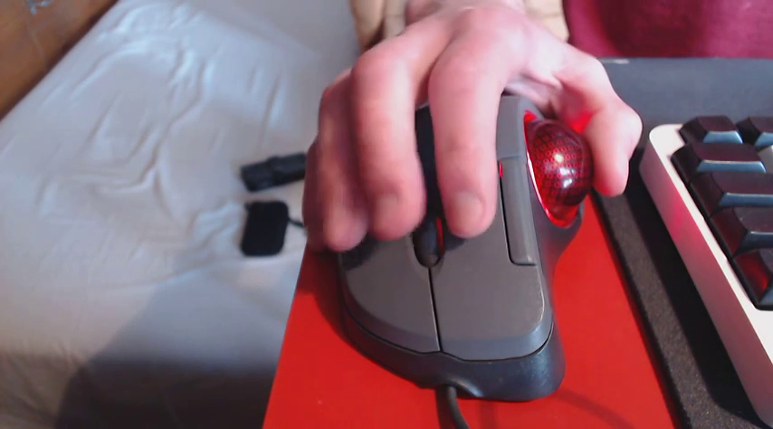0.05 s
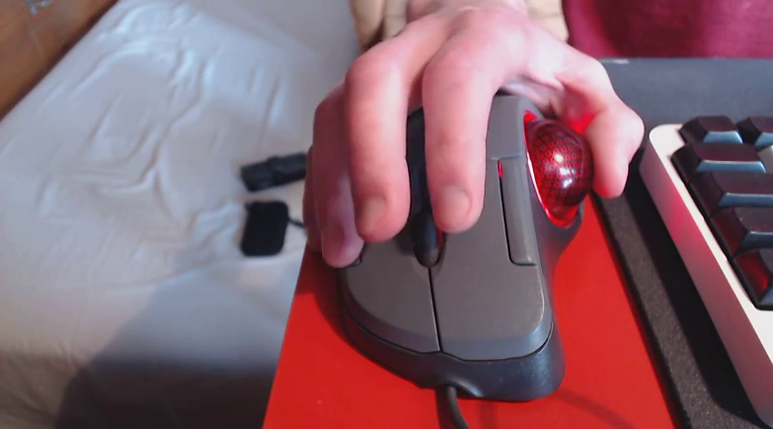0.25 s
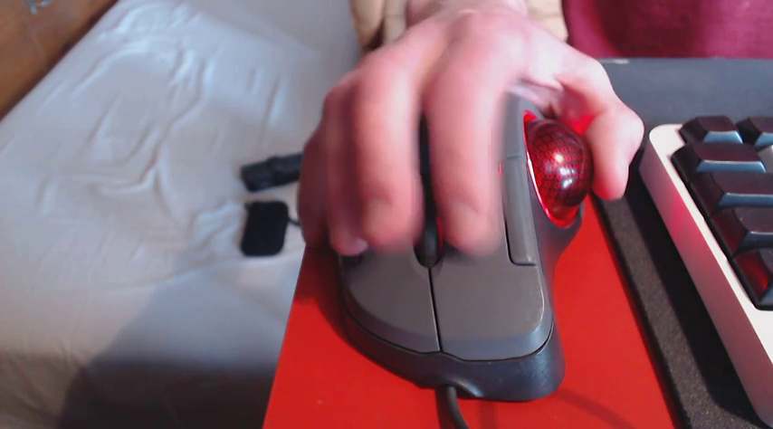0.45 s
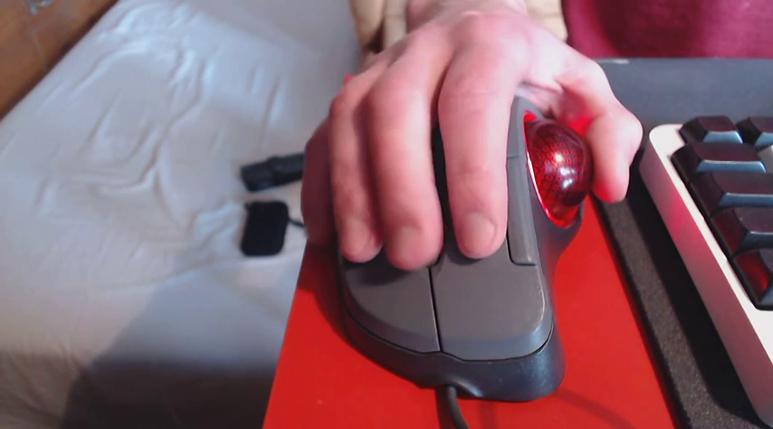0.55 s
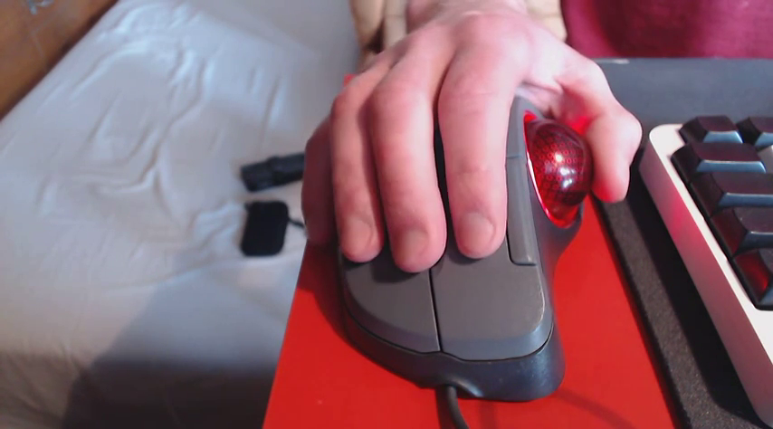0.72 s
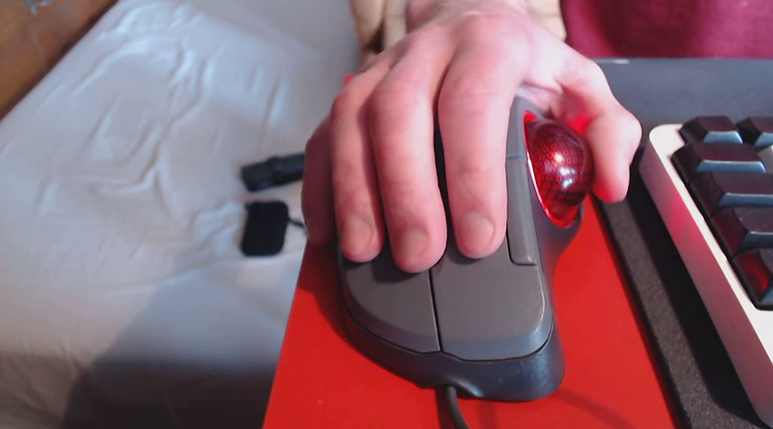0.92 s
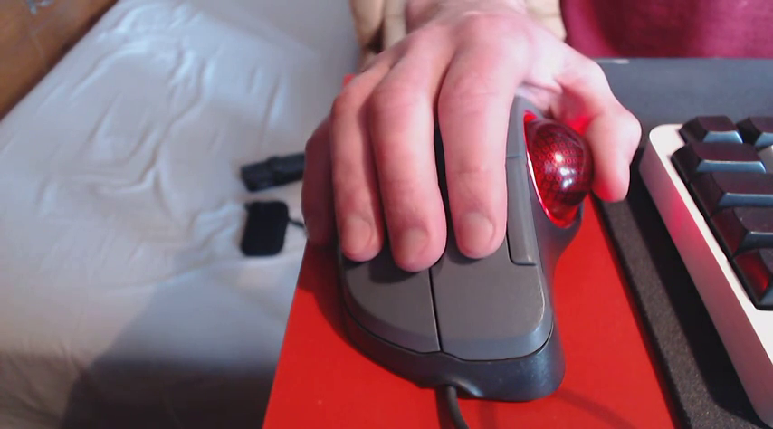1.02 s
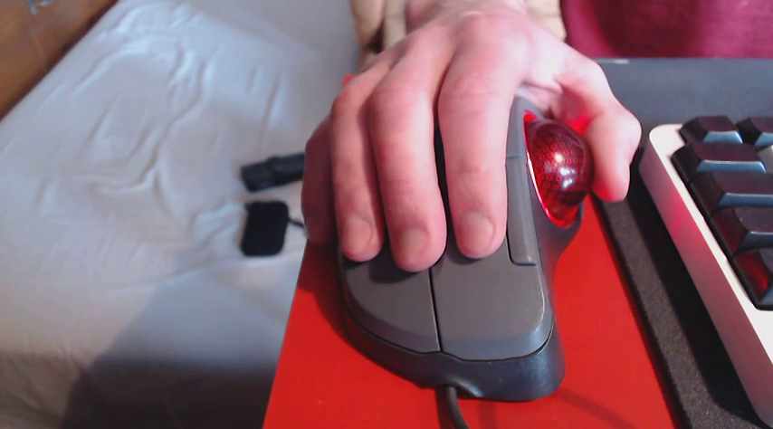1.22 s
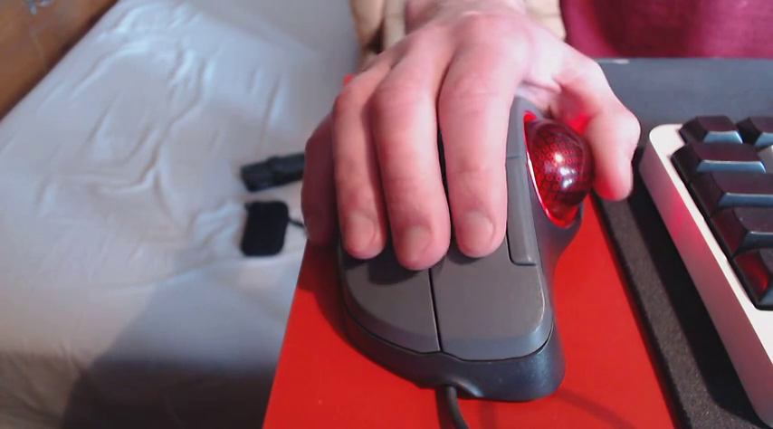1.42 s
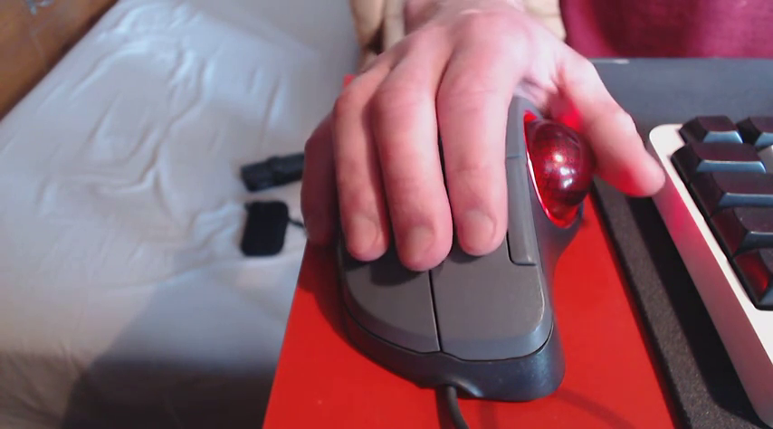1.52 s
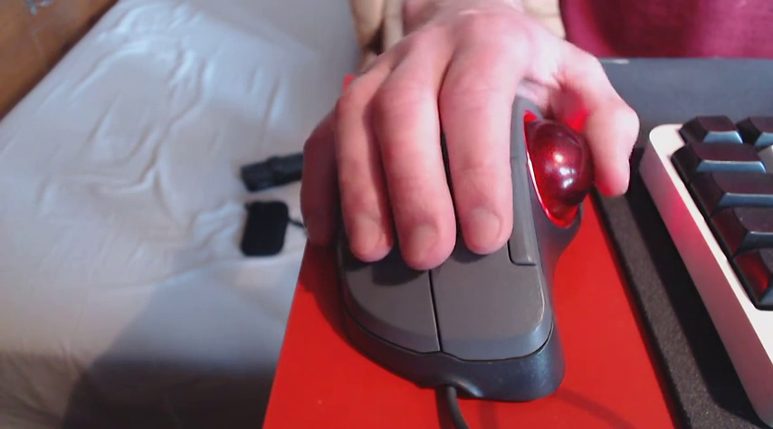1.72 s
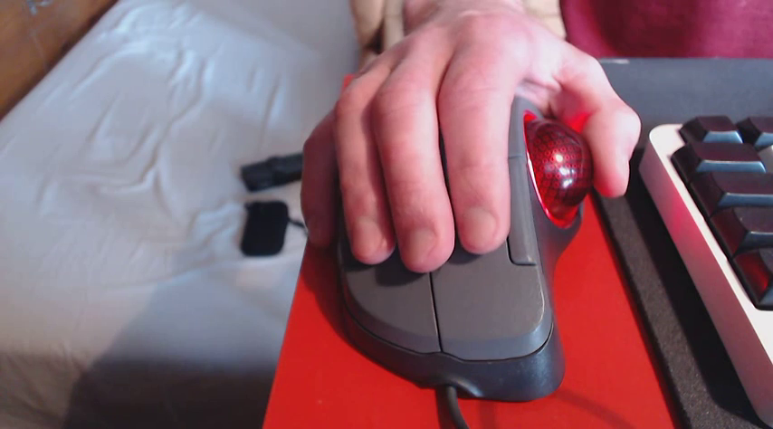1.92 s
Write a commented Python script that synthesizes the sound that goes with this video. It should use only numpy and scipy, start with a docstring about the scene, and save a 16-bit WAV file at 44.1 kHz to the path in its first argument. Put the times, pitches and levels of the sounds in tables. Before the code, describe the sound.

Close clicks of a plastic trackball mouse in a quiet room with a low hum. Two sharp clicks lead into a hard knock and quick fingertip taps; after a pause, fingers softly rub the shell and click once more.

```python
"""A desk in a quiet room, close up: fingers shift on a plastic trackball mouse.
Behind it: room noise, a low hum and a faint pulsing electrical whine.
Fingertips rub (stick-slip) and tap on the plastic. Three button clicks: switch snap, spring ping, ring.
A finger lands hard and knocks the shell; a low thump swells and a longer, low-mid ring lingers."""
import sys
import numpy as np
from scipy import signal
from scipy.fft import rfft, irfft
from scipy.io import wavfile

SR = 44100
rng = np.random.default_rng(int(sys.argv[2]) if len(sys.argv) > 2 else 0)


def dump(signal):
    """Clip the signal to [-1, 1] and save it as 16-bit WAV at the path in sys.argv[1]."""
    limited = np.clip(np.atleast_2d(signal).T, -1, 1)
    pcm = np.round(limited * 32767).astype(np.int16)
    wavfile.write(sys.argv[1], SR, pcm)


N = 85995
T = np.arange(N) / SR
BIN_HZ = np.maximum(np.arange(N // 2 + 1) * SR / N, 1)

# spectra of room noise and reflections: f/Hz, level/dB
FLOOR_SPECTRUM = [(15, -54.5), (28, -40), (60, -40), (150, -40.5), (230, -39.5), (310, -53), (600, -53.5),
                  (1050, -58), (1650, -61), (2600, -67), (4000, -72.5), (7000, -73), (9000, -78)]
ROOM_SPECTRUM = [(100, -8), (400, -6.5), (800, -16), (1500, -14.5), (3000, -16.5), (6000, -21.5),
                 (9000, -20.5)]
# stereo width of room noise, reflections, direct sound: f/Hz, side re mid/dB
FLOOR_SIDE = [(40, -13), (150, -11), (500, -5), (1400, -1), (3000, 1.5), (8000, 1.5)]
ROOM_SIDE = [(100, -8.5), (700, -9.5), (1400, -8.5), (3000, -0.5), (8000, -2)]
DIRECT_SIDE = [(100, -15), (600, -19), (1400, -17), (2500, -8), (8000, -8)]
# steady tones: f/Hz, rms level/dB
HUM_TONES = [(119.7, -63), (195, -65), (1200, -82.5), (1600, -79), (1799, -84.5), (7000, -88.5),
             (8000, -92.5)]
# electrical whine: f/Hz, first pulse t/s, level/dB
WHINE_TONES = [(4510, .0565, -71), (8020, .0640, -68)]
# skin rubbing on plastic: t/s, level/dB
RUB_ENVELOPE = [(1.09, -77), (1.17, -60), (1.205, -57), (1.26, -48.5), (1.31, -55.5), (1.366, -45.5),
                (1.421, -73), (1.45, -45), (1.503, -45), (1.544, -52.5), (1.62, -71)]
# fingertip taps: t/s, ring level/dB, pat level/dB, tilt/(dB/oct)
TAP_EVENTS = [(0.0376, -41.5, -35, -5), (0.1273, -42, -43, -1), (0.3925, -43, -37.5, -5),
              (0.4135, -35, -43, 2.5), (0.4178, -39.5, -52.5, -5), (0.461, -35.5, -57, -1.5),
              (0.5082, -31, -35.5, 3), (0.5124, -27.5, -32, 0), (1.1130, -58, -55, -5.5),
              (1.1545, -50.5, -64, -4), (1.1840, -47.5, -48.5, -5), (1.2670, -48, -55, -4.5),
              (1.3570, -43.5, -37.5, 2), (1.3820, -50.5, -50, -6), (1.4440, -53, -51, 2),
              (1.503, -46, -44.5, -6.5)]
# clicks: t/s, button level/dB, spring level/dB, housing level/dB, snap level/dB, snap tilt/(dB/oct)
CLICK_EVENTS = [(0.2000, -27, -35, -62, -25.5, -3.5), (0.3738, -27, -33, -47, -28.5, -.5),
                (1.8969, -33.5, -60, -38, -35.5, 2)]
# knock and rebounds: t/s, shell level/dB, crack level/dB, tilt/(dB/oct)
KNOCK_EVENTS = [(0.4337, -32.5, -16.5, 0), (0.4351, -57.5, -22, 0), (0.4360, -25.5, -31.5, 0),
                (0.443, -49, -30, -2.5), (0.4453, -47, -30.5, 1), (0.4499, -36.5, -42.5, -8)]
# spectra of skin rub, fingertip pat, switch snap, knock crack: f/Hz, level/dB
RUB_SPECTRUM = [(100, -5.5), (280, -6.5), (650, 5.5), (1050, -7), (1400, -5), (2000, -3), (3800, -19),
                (5300, -16), (9000, -32.5)]
PAT_SPECTRUM = [(40, -12), (150, -3.5), (280, 3), (600, 5), (1100, -5), (1800, -3), (2600, -13),
                (5000, -18), (9000, -32)]
SNAP_SPECTRUM = [(60, -14), (200, -4.5), (500, -3), (1000, -9.5), (1700, 1), (2800, -3.5), (3800, -11),
                 (5500, -3), (7000, -10), (9000, -19.5)]
CRACK_SPECTRUM = [(60, -15.5), (300, -21), (550, 3), (820, 1), (1030, -8), (1400, 5), (2200, -7),
                  (3200, -1.5), (4200, -7.5), (5600, -1), (7200, -14.5), (9000, -20.5)]
# modes of tapped shell, button, switch housing, whole shell: f/Hz, level/dB, t60/s
TAPPED_SHELL_MODES = [(275, -15.5, 0.043), (584, -10.5, 0.057), (812, -7.5, 0.028), (1390, -9.5, 0.025),
                      (1540, -10, 0.033), (2100, -18, 0.022), (2772, -25, .04)]
BUTTON_MODES = [(330, -18, 0.055), (483, -14.5, 0.02), (713, -1, 0.039), (828.5, -7, 0.034),
                (1143, -22.5, .02), (1432, -9, 0.017), (2075, -18.5, .018), (2890, -22.5, .022)]
HOUSING_MODES = [(1389, -3.5, 0.041), (2160, -11, 0.0085), (2750, 3, 0.0093), (4540, 0, 0.012),
                 (5500, -10, 0.015), (6960, -10, .018), (8520, -7.5, 0.0095)]
SHELL_MODES = [(525, -5, 0.058), (585, -4, 0.023), (734, -2, 0.028), (1307, -0.5, 0.024),
               (1500, -4.5, 0.022), (1680, -10.5, .04), (2450, -12, 0.035), (2880, -11.5, 0.085),
               (3170, -16, .04), (4010, -11, 0.026), (5500, -16, .025)]
# longer, low-mid ring after the knock: f/Hz, level/dB, t60/s
AFTER_RING_MODES = [(491, -43, 0.05), (592, -52, .14), (700, -51, .14), (794, -33, 0.25), (802, -30.5, .11),
                    (1293, -56, .1)]

KNOCK_S = KNOCK_EVENTS[0][0]


def from_db(db):
    """Decibels to gain."""
    return 10 ** (np.asarray(db) / 20)


def tilt_db(hz, db_oct, pivot_hz=1500, flat_below_hz=500):
    """Treble slope, flat in the bass."""
    return db_oct * np.log2(np.maximum(hz, flat_below_hz) / pivot_hz)


def colour(x, spectrum, db_oct=0):
    """Minimum-phase filter along a (f/Hz, level/dB) curve."""
    hz, db = np.transpose(spectrum)
    curve_db = np.interp(np.log(BIN_HZ), np.log(hz), db) + tilt_db(BIN_HZ, db_oct)
    cepstrum = irfft(np.log(from_db(curve_db)), N)
    cepstrum[1:] *= 2 * (np.arange(1, N) < N / 2)
    return irfft(rfft(x) * np.exp(rfft(cepstrum)), N)


def pan(x, left_db):
    """Level pan, left re right."""
    return x * from_db(np.array([[.5], [-.5]]) * left_db)


def spread(pair, side=DIRECT_SIDE):
    """Mid/side to stereo: narrow bass, wide treble."""
    return pair[0] + colour(pair[1], side) * np.array([[1], [-1]])


def noise(spectrum, side):
    """Coloured stereo noise."""
    return colour(spread(rng.standard_normal((2, N)), side), spectrum)


def decay(start_s, t60_s, hold_s=0):
    """Instant attack, hold, exponential release."""
    release_s = np.maximum(T - start_s - hold_s, 0)
    return (T >= start_s) * np.exp(-np.minimum(np.log(1000) * release_s / t60_s, 20))


def ring(modes, start_s, db_oct=0):
    """Struck modes, neighbours in opposite phase."""
    out = np.zeros(N)
    for k, (hz, db, t60_s) in enumerate(modes):
        gain = (-1) ** k * from_db(db + tilt_db(hz, db_oct))
        out += gain * decay(start_s, t60_s) * np.sin(2 * np.pi * hz * (T - start_s))
    return out


def contact(spectrum, db_oct, start_s, t60_s, hold_s, push_db=10.5):
    """One sharp push, then a short rattle of dense plastic resonances."""
    burst = spread(rng.standard_normal((2, N)) * decay(start_s, t60_s, hold_s))
    burst[:, int(start_s * SR)] += from_db(push_db)
    return colour(burst, spectrum, db_oct)


def background(period_s=1 / 15, pulse_s=.0027):
    """Room noise, steady hum, evenly pulsing electrical whine."""
    hum = sum(np.sqrt(2) * from_db(db) * np.sin(2 * np.pi * (hz * T + rng.random()))
              for hz, db in HUM_TONES)
    whine = np.zeros(N)
    for hz, first_s, db in WHINE_TONES:
        offset_s = (T - first_s + period_s / 2) % period_s - period_s / 2
        whine += from_db(db) * np.exp(-(offset_s / pulse_s) ** 2) * np.sin(2 * np.pi * hz * T)
    return pan(noise(FLOOR_SPECTRUM, FLOOR_SIDE) + hum, left_db=2) + whine


def reflections(x):
    """Dense, dull reverb of a small furnished room."""
    tail = decay(start_s=.0031, t60_s=.22)
    response = noise(ROOM_SPECTRUM, ROOM_SIDE) * tail / np.sqrt(np.sum(tail ** 2))
    return signal.fftconvolve(x, response, axes=1)[:, :N]


def rubbing(slips_per_s=2500, scatter_db=1):
    """Skin sticks and slips on plastic in dense, tiny grains."""
    slips = rng.random((2, N)) < slips_per_s / SR
    signs = rng.choice([-1, 1], (2, N))
    grains = slips * signs * from_db(scatter_db * np.minimum(rng.exponential(1, (2, N)), 4))
    t_s, db = np.transpose(RUB_ENVELOPE)
    envelope = from_db(np.interp(T, t_s, db)) * (T > t_s[0]) * (T < t_s[-1])
    return colour(spread(grains / grains.std()), RUB_SPECTRUM) * envelope


def taps():
    """Soft fingertips: dull pat, short shell ring."""
    out = np.zeros((2, N))
    for t_s, ring_db, pat_db, db_oct in TAP_EVENTS:
        out += from_db(ring_db) * ring(TAPPED_SHELL_MODES, t_s, db_oct)
        out += from_db(pat_db) * contact(PAT_SPECTRUM, db_oct, t_s, t60_s=.014, hold_s=.0024)
    return out


def spring(start_s, settled_hz=5420, sag_hz=700, sag_s=.0013):
    """Switch spring: a brief ping that starts sharp and settles."""
    hz = settled_hz + sag_hz * np.exp(-np.maximum(T - start_s, 0) / sag_s)
    phase = 2 * np.pi * np.cumsum(hz * (T >= start_s)) / SR
    return decay(start_s, t60_s=.01, hold_s=.0021) * np.sin(phase)


def clicks():
    """The switch snaps, its spring pings, housing and button ring."""
    out = np.zeros((2, N))
    for t_s, button_db, spring_db, housing_db, snap_db, db_oct in CLICK_EVENTS:
        out += from_db(button_db) * ring(BUTTON_MODES, t_s)
        out += from_db(housing_db) * ring(HOUSING_MODES, t_s)
        out += pan(from_db(spring_db) * spring(t_s), left_db=-1)
        out += from_db(snap_db) * contact(SNAP_SPECTRUM, db_oct, t_s, t60_s=.022, hold_s=.0015)
    return out


def thump(mode_hz=106.7, level_db=-49, rise_s=.055):
    """One low mode swells and fades after the knock."""
    age_s = np.maximum(T - KNOCK_S, 0)
    swell = (age_s / rise_s * np.exp(1 - age_s / rise_s)) ** 2
    return pan(from_db(level_db) * swell * np.sin(2 * np.pi * mode_hz * age_s), left_db=5)


def knock(after_ring_rise_s=.008):
    """A hard contact and its rebounds rattle the shell; a longer, low-mid ring lingers."""
    fade_in = 1 - np.exp(-np.maximum(T - KNOCK_S, 0) / after_ring_rise_s)
    shell = np.zeros((2, N))
    for t_s, shell_db, crack_db, db_oct in KNOCK_EVENTS:
        crack = contact(CRACK_SPECTRUM, db_oct, t_s, t60_s=.022, hold_s=.00022)
        shell += pan(from_db(crack_db) * crack, left_db=2)
        shell += from_db(shell_db) * ring(SHELL_MODES, t_s, db_oct)
    return shell + fade_in * ring(AFTER_RING_MODES, KNOCK_S)


def scene(left_lag_s=28e-6):
    """Hand on mouse, reflections, low thump, background."""
    left, right = clicks() + knock() + taps() + rubbing()
    lag = np.exp(-2j * np.pi * BIN_HZ * left_lag_s)  # mouse nearer the right microphone port
    hand = np.array([irfft(rfft(left) * lag, N), right])
    return hand + reflections(hand) + thump() + background()


def record(dry, cutoff_hz=9150):
    """Microphone band limit: steep low-pass."""
    return signal.sosfilt(signal.ellip(12, .1, 70, cutoff_hz, fs=SR, output="sos"), dry)


dry = scene()
out = record(dry)
dump(out)
```